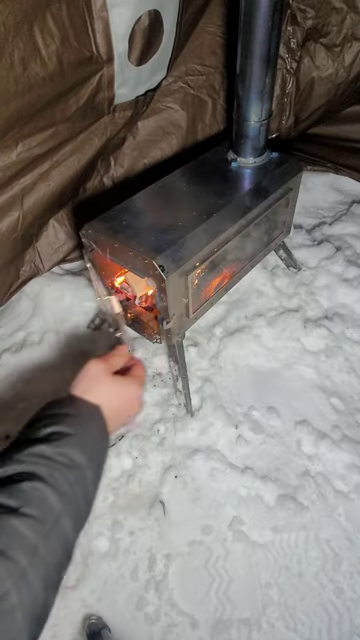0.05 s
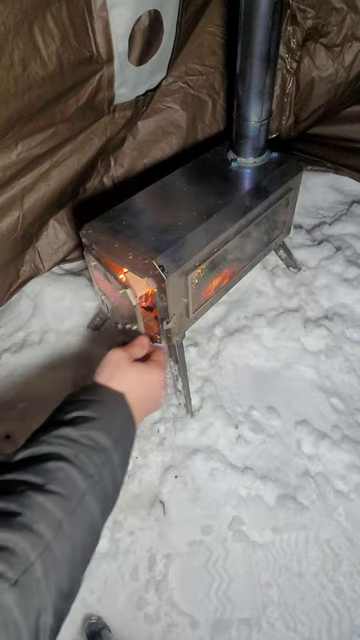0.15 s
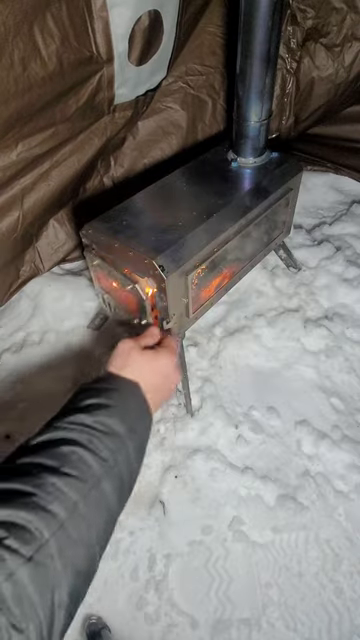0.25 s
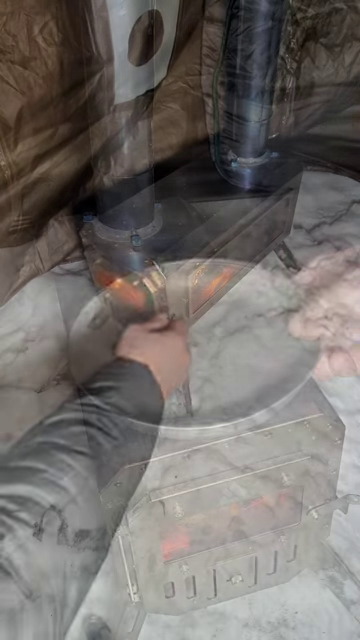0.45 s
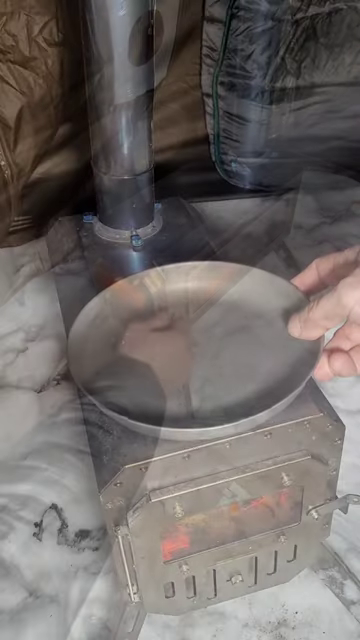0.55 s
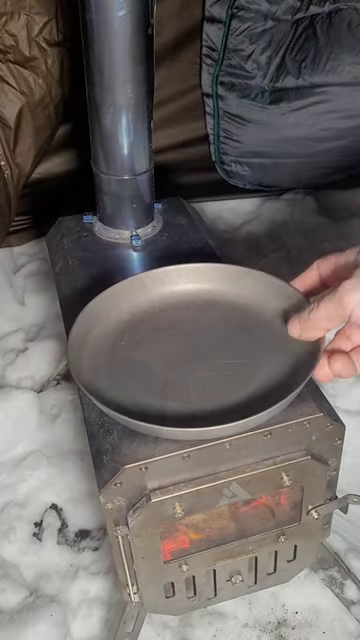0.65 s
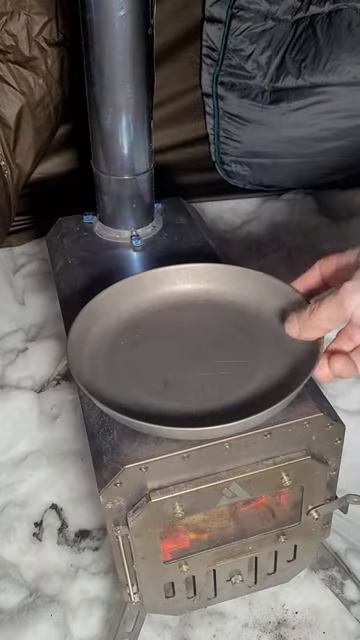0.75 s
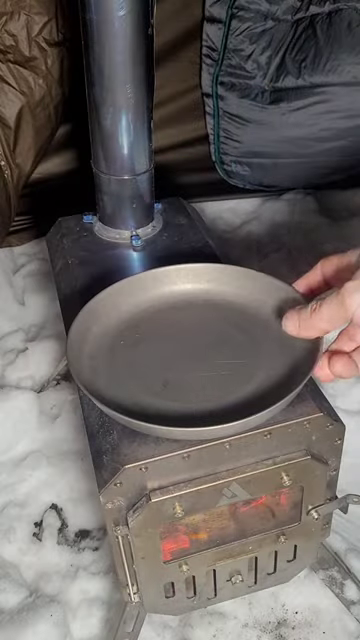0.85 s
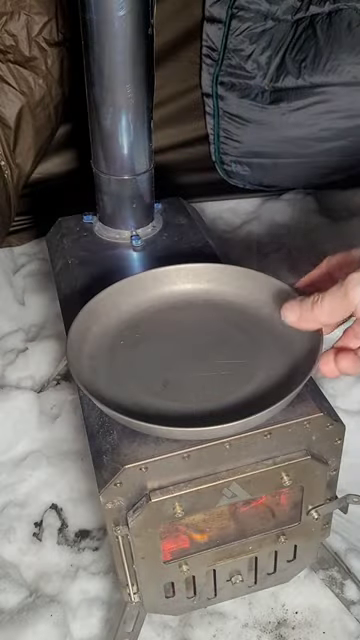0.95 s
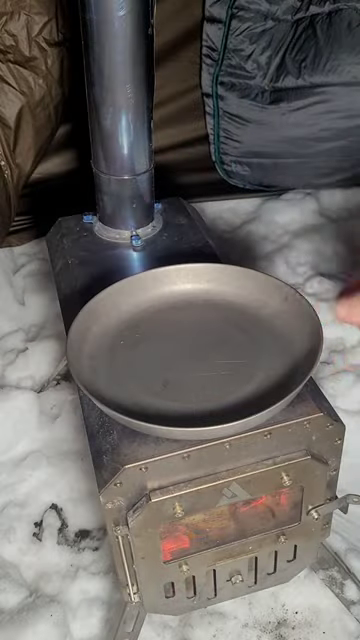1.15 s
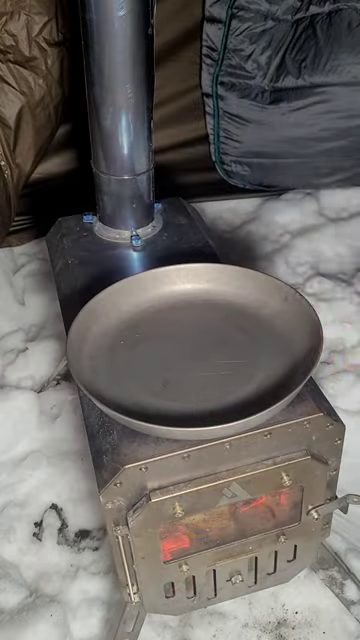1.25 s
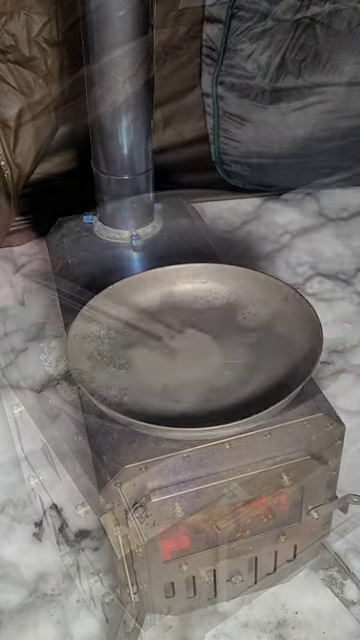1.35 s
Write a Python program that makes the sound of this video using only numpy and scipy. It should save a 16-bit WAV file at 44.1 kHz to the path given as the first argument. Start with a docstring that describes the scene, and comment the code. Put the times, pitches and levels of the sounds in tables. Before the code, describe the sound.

One sharp metal clack closes a stove door, followed by a light pan set down and pushed about in short, hissing scrapes. Two dull thuds come last, while the fire draws softly inside a tent with no echo.

```python
"""First comes the soft, low draught of a small sheet-steel wood stove, with a faint hiss and a sleeve's rustle.
The door shuts with one sharp clack, an impact that excites its modes, and the handle rubs home.
A light metal pan lands on the stove top and is pushed about in short scrapes: by stick-slip friction
the rim hisses, the base grinds and the top plate booms. Two dull thuds follow. The tent gives no echo."""
import sys
import numpy as np
from scipy import signal
from scipy.fft import rfft, irfft, next_fast_len
from scipy.io import wavfile
from scipy.ndimage import uniform_filter1d, map_coordinates

SR = 44100
rng = np.random.default_rng(int(sys.argv[2]) if len(sys.argv) > 2 else 0)


def pcm_store(signal):
    """Save signal as 16-bit PCM."""
    levels = np.round(np.clip(np.atleast_2d(signal), -1, 1) * 32767)
    wavfile.write(sys.argv[1], SR, levels.astype(np.int16).T)


N = 61739

# envelopes of the draught and the faint hiss (t/s, level/dB)
DRAUGHT_ENVELOPE = [(0, -59.5), (.11, -50), (.2, -54), (.3, -54.5), (.36, -58), (.45, -55.5), (.56, -53),
                    (.9, -59.5), (1.06, -58), (1.17, -58.5), (1.21, -52.5), (1.26, -56.5), (1.295, -50),
                    (1.35, -55.5), (1.4, -54.5)]
AIR_ENVELOPE = [(0, -57), (.18, -57), (.3, -59), (.39, -58), (.55, -55), (1.07, -65), (1.2, -62.5),
                (1.3, -60), (1.4, -58)]
# spectra of draught, faint hiss, sleeve and ticks (f/Hz, level/dB)
DRAUGHT_SPECTRUM = [(15, -43), (25, -17.5), (75, -10.5), (133, -4), (238, -1.5), (271, -3), (350, -17.5),
                    (429, -18), (554, -21), (800, -51.5), (1440, -65), (2000, -62), (2600, -65),
                    (4400, -120)]
AIR_SPECTRUM = [(350, -35), (600, -5), (833, -4), (905, -8.5), (1400, -19), (2230, -17), (4940, -12.5),
                (7240, -10.5), (9020, -17.5), (15800, -5.5)]
SLEEVE_SPECTRUM = [(250, -8), (500, 0), (820, 8), (1300, -6), (3000, -1.5), (8000, -20)]
TICK_SPECTRUM = [(1000, -33), (3500, -12), (7000, -1), (9000, -7), (13500, 10), (15700, 17), (16200, -17)]
# reach for the door (t/s, rise/s, length/s, sag/dB, level/dB)
SLEEVE_STROKES = [(0, 0.01, 0.326, 1, -66.5)]
# touches of handle and pan rim (t/s, level/dB)
TICK_TOUCHES = [(.047, -54), (.193, -44), (.601, -37), (.7505, -37), (.8335, -26), (.8975, -37),
                (1.231, -58)]

# spectra of the door's crack on each side and of its crowded high modes (f/Hz, level/dB)
CRACK_LEFT_SPECTRUM = [(150, -23.5), (550, -58), (1100, -3), (2600, -7.5), (4000, -13), (6000, -4),
                       (7400, 7), (8400, -7), (9700, 5.5), (12500, -12), (16000, -8)]
CRACK_RIGHT_SPECTRUM = [(150, -19), (550, -1.5), (1100, -16), (2600, -12.5), (4000, -22), (6000, -11),
                        (7400, -10.5), (9500, -11), (11000, -9), (13000, 12.5), (16000, -29)]
CLANG_SPECTRUM = [(500, -19.5), (1500, -6), (3000, -7.5), (5000, -4), (7300, -5), (8500, -1), (10500, -0.5),
                  (12500, 2.5), (15500, 4)]
# the latch rattling after the blow (t/s, level/dB re the crack)
LATCH_RATTLE = [(.2383, -23), (.2404, -22), (.2425, -21), (.2438, -21), (.2483, -25), (.2555, -30),
                (.2585, -31), (.2680, -36), (.2725, -37)]
# modes of door and frame (f/Hz, level/dB, T60/s)
DOOR_FRAME_MODES = [(166, -73, 0.32), (248, -26.5, 0.039), (276.4, -36.5, 0.076), (830, -25.5, 0.016),
                    (898, -33.5, 0.011), (1020, -47.5, 0.019), (1338, -24, 0.015), (2190, -27.5, 0.024),
                    (3560, -28, 0.017), (7420, -33, 0.054), (12400, -30, 0.082), (14800, -37, 0.066)]
# rubs of the handle in its catch (t/s, rise/s, length/s, sag/dB, rasp/dB, ring/dB)
HANDLE_RUBS = [(0.427, 0.0051, 0.052, -4, -51.5, -47), (0.465, 0.032, 0.018, -2, -52, -42.5),
               (0.492, 0.011, 0.031, -4, -54.5, -42)]

# pushes of the pan (t/s, rise/s, length/s, sag/dB, hiss/dB, grind/dB, boom/dB)
PAN_PUSHES = [(0.587, 0.022, 0.015, -3.5, -29.5, -51, -44.5), (0.616, 0.0056, 0.033, -2, -53.5, -54, -44.5),
              (0.648, 0.011, 0.032, 0, -70, -45.5, -39.5), (0.661, 0.013, 0.04, -9, -33.5, -36, -33),
              (0.693, 0.013, 0.023, -4, -43.5, -53, -40.5), (.748, .005, 0.011, -3, -60, -51, -40.5),
              (0.756, 0.011, 0.011, -0.5, -76, -69, -43), (0.787, 0.0088, 0.022, -7, -69, -67.5, -49),
              (0.797, 0.015, 0.044, -1.5, -45.5, -71, -72), (0.82, 0.0037, 0.023, 0.5, -33, -72, -52),
              (0.854, 0.0093, 0.042, -3.5, -39, -62, -43.5), (.900, 0.0067, 0.024, -10.5, -52, -72, -47),
              (0.923, 0.032, 0.06, -4, -47.5, -63.5, -70), (.966, 0.005, 0.043, -5, -49.5, -59.5, -55.5)]
# spectra of handle rasp, rim hiss, its bite on landing, pan base and shaking legs (f/Hz, level/dB)
RASP_SPECTRUM = [(300, 7), (900, -17), (1400, -1.5), (2500, -2.5), (5000, -5.5), (9000, -12), (15000, -13)]
RIM_SPECTRUM = [(1500, -36), (2600, -17), (3600, -15), (4700, -3.5), (7000, 0.5), (9000, -2), (11500, 0),
                (14000, 2.5), (15600, 6.5), (16200, -32.5)]
BITE_SPECTRUM = [(2000, -18.5), (3400, 2), (4300, 1.5), (6000, -7), (7500, 5), (9500, -19)]
GRIND_SPECTRUM = [(300, -11), (600, -2.5), (850, 5), (1200, -3), (1900, 4), (2400, 1.5), (3200, 1.5),
                  (4800, 0.5), (7000, -11), (10000, -15)]
LEG_SPECTRUM = [(20, -12), (60, 6), (110, 6.5), (180, -9), (400, -35)]
# resonances of stove front, pan and top plate (f/Hz, bandwidth/Hz, level/dB)
STOVE_FRONT_MODES = [(136, 28, 2), (188, 54, 1), (256, 56, 2), (440, 170, -12), (875.4, 13.4, 1)]
PAN_BODY_MODES = [(900, 75, 4.5), (1224, 39, 7.5), (2260, 68, 5), (2470, 43, 10.5), (3695, 15, 12),
                  (4654, 22, 7)]
TOP_PLATE_MODES = [(99, 8.3, -28), (170.2, 33.3, -2.5), (222.6, 32.2, 0.5), (264.2, 24.8, -1.5),
                   (299, 40, -5), (404.5, 23, -9.5), (458.8, 18.4, -7.5), (540, 18, -12.5),
                   (582, 105, -17.5), (690.3, 7.3, -15), (804, 15, -17.5), (912, 15, -21)]
# the pan touching down (t/s, plate f/Hz, plate/dB, clank/dB)
PAN_LANDINGS = [(0.599, 279.5, -28.5, -62), (.655, 193, -28.5, -30), (.672, 224.4, -32.5, -46),
                (.767, 238, -27, -50.5), (.826, 240, -37, -71)]
# thuds once the pan is still (t/s, f/Hz, level/dB)
LOW_THUDS = [(1.288, 119, -39), (1.329, 138, -36)]

# likeness of the two channels (f/Hz, correlation)
COHERENCE = [(200, 0.98), (700, 0.7), (1500, 0.35), (4000, 0.024), (15000, 0)]
# stereo balances (f/Hz, left minus right/dB)
CLANG_BALANCE = [(1000, 6), (5000, 1), (9000, 9.5), (11000, -11), (13000, -11), (16000, 12.5)]
SCRAPE_BALANCE = [(300, 0), (1500, 4), (4000, 3.5), (7500, 4), (10500, 2), (15000, -2.5)]
FRONT_BALANCE, AIR_BALANCE = [(200, -2.5)], [(2000, 1), (12000, -0.92)]
SLEEVE_BALANCE, TICK_BALANCE = [(1000, 0.004)], [(4000, 2.4), (13000, -1)]

TIME = np.arange(N) / SR
DOOR_S = 0.2367


def amp(db):
    """Amplitude ratio of a level in decibels."""
    return 10 ** (np.asarray(db) / 20)


def unit(x):
    """Normalisation to rms 1."""
    return x / np.sqrt(np.mean(x ** 2) + 1e-20)


def along(points, hz):
    """Interpolation on a logarithmic frequency axis."""
    f, v = np.transpose(points)
    return np.interp(np.log(hz + 1), np.log(f + 1), v)


def envelope(points):
    """Gain per sample, interpolated in decibels."""
    return amp(np.interp(TIME, *np.transpose(points)))


def noise():
    """Two independent channels of white noise."""
    return rng.standard_normal((2, N))


def filtered(x, response):
    """Linear filtering: the spectrum is multiplied by a frequency response."""
    m = next_fast_len(N + SR // 2)
    return irfft(rfft(x, m) * response(np.fft.rfftfreq(m, 1 / SR)), m)[..., :N]


def colour(points):
    """Magnitude response through the points of a spectrum."""
    return lambda hz: amp(along(points, hz))


def resonances(modes):
    """Modal superposition: damped resonators add with alternating sign."""
    return lambda f: sum((-1) ** k * amp(db) * 1j * f * width / (f0 * f0 - f * f + 1j * f * width)
                         for k, (f0, width, db) in enumerate(modes))


def decay(start, t60):
    """Exponential damping from start, by 60 dB in t60 seconds."""
    t = TIME - start
    return (t >= 0) * np.exp(-np.log(1000) * np.maximum(t, 0) / t60)


def stroke(start, rise, length, sag_db, t60=0.14):
    """Driven vibration swells and sags during a rub, then decays freely."""
    t = TIME - start
    swell = np.clip(t / rise, 0, 1) ** 2
    sag = amp(sag_db * np.clip(t / length, 0, 1))
    return swell * sag * np.exp(-np.log(1000) * np.maximum(t - length, 0) / t60)


def stereo(pair, response, balance):
    """Partial coherence: two signals mix to stereo of rms 1, alike in the bass, apart in the treble."""
    angle = lambda hz: np.arccos(np.clip(along(COHERENCE, hz), -1, 1)) / 2
    mid, side = filtered(pair, lambda hz: response(hz) * np.array([np.cos(angle(hz)), np.sin(angle(hz))]))
    gains = lambda hz: amp(along(balance, hz) * np.array([[.5], [-.5]]))
    return unit(filtered(np.array([mid + side, mid - side]), gains))


def steadied(x, samples=900):
    """Division by the running rms evens out the chance swells of narrow-band noise."""
    return x / np.sqrt(np.abs(uniform_filter1d(np.mean(x ** 2, axis=0), samples)) + 1e-3)


def draught():
    """Flow noise: the air drawn by the fire flutters at low frequencies."""
    flow = stereo(noise(), colour(DRAUGHT_SPECTRUM), FRONT_BALANCE)
    return envelope(DRAUGHT_ENVELOPE) * steadied(flow, samples=1200)


def fire_hiss(pops_per_s=25, pop_db=20.5, spread_db=0.5):
    """Shot noise: the fire's sparse random impulses crackle in a faint hiss."""
    pops = (rng.random(N) < pops_per_s / SR) * amp(pop_db + spread_db * noise())
    return envelope(AIR_ENVELOPE) * stereo(noise() + pops, colour(AIR_SPECTRUM), AIR_BALANCE)


def sleeve():
    """Friction noise of cloth: a sleeve rustles as it reaches for the door."""
    reach = sum(amp(db) * stroke(*shape) for *shape, db in SLEEVE_STROKES)
    return reach * stereo(noise(), colour(SLEEVE_SPECTRUM), SLEEVE_BALANCE)


def ticks():
    """Brief contacts of metal excite mainly high frequencies, which damp quickly."""
    touches = sum(amp(db) * decay(s, t60=.04) for s, db in TICK_TOUCHES)
    return touches * stereo(noise(), colour(TICK_SPECTRUM), TICK_BALANCE)


def crack(spectrum, size=2048):
    """A minimum-phase pulse: the energy of an impact comes as early as its spectrum allows."""
    cepstrum = irfft(np.log(amp(along(spectrum, np.fft.rfftfreq(size, 1 / SR)))))
    cepstrum[1:size // 2] *= 2
    cepstrum[size // 2 + 1:] = 0
    return irfft(np.exp(rfft(cepstrum)))


def wandering_mode(hz, t, depth=.011, changes_per_s=350):
    """Random frequency modulation: a mode's pitch wanders as loose parts touch."""
    drift = depth * map_coordinates(rng.standard_normal(N), [t * changes_per_s])
    return np.cos(2 * np.pi * hz * (t + np.cumsum(drift * (t > 0)) / SR))


def door(crack_db=5.5, scatter_s=.0002, attack_s=0.00013):
    """Impact excitation: the door cracks on its frame, the latch rattles and the modes ring freely."""
    t = np.maximum(TIME - DOOR_S, 0)
    impulses = np.zeros((2, N))
    impulses[:, round(DOOR_S * SR)] = amp(crack_db)
    for s, db in LATCH_RATTLE:
        arrivals = np.round((s + scatter_s * rng.standard_normal(2)) * SR).astype(int)
        impulses[[0, 1], arrivals] += amp(crack_db + db)
    snap = np.array([signal.fftconvolve(side, crack(spectrum))[:N]
                     for side, spectrum in zip(impulses, (CRACK_LEFT_SPECTRUM, CRACK_RIGHT_SPECTRUM))])
    ring = sum(amp(db + rng.normal(0, 1)) * decay(DOOR_S, t60) * wandering_mode(hz, t)
               for hz, db, t60 in DOOR_FRAME_MODES)
    two_stage_decay = amp(-14) * decay(DOOR_S, t60=0.024) + amp(-29) * decay(DOOR_S, t60=0.12)
    clang = two_stage_decay * stereo(noise(), colour(CLANG_SPECTRUM), CLANG_BALANCE)
    return snap + (ring + clang) * (1 - np.exp(-t / attack_s))


def friction(spectrum, slips_per_s=5000, spread_db=-0.5, grit_db=2.2, grit_per_s=450,
             ripple_db=3.1, mode_spacing_hz=70):
    """Stick-slip friction: a dense, uneven train of tiny slips drives the metal's crowded resonances."""
    grit = amp(grit_db * map_coordinates(rng.standard_normal(N), [TIME * grit_per_s]))
    slips = (rng.random((2, N)) < slips_per_s / SR) * noise() * amp(spread_db * noise())
    mode_strengths = rng.standard_normal(N)
    ripple = lambda hz: amp(ripple_db * map_coordinates(mode_strengths, [hz / mode_spacing_hz]))
    return unit(grit * stereo(slips, lambda hz: colour(spectrum)(hz) * ripple(hz), SCRAPE_BALANCE))


def handle():
    """Forced vibration: the handle rasps in its catch and makes the stove front ring."""
    rasp = friction(RASP_SPECTRUM)
    ring = steadied(stereo(noise(), resonances(STOVE_FRONT_MODES), FRONT_BALANCE))
    return sum(stroke(*shape) * (amp(rasp_db) * rasp + amp(ring_db) * ring)
               for *shape, rasp_db, ring_db in HANDLE_RUBS)


def pan_scrapes(bite_db=-3, bite_fade_db_per_s=51, ring_db=-9, legs_db=-16.5):
    """Sliding friction: the rim hisses, the base grinds and rings, the plate booms as a sounding board."""
    since_first_push = np.maximum(TIME - PAN_PUSHES[0][0], 0)
    bite = amp(bite_db - bite_fade_db_per_s * since_first_push) * friction(BITE_SPECTRUM)
    rim_spots = [friction(RIM_SPECTRUM) + bite for _ in range(3)]
    grind = friction(GRIND_SPECTRUM)
    grind += amp(ring_db) * stereo(noise(), resonances(PAN_BODY_MODES), SCRAPE_BALANCE)
    plate = stereo(noise(), resonances(TOP_PLATE_MODES), SCRAPE_BALANCE)
    legs = amp(legs_db) * stereo(noise(), colour(LEG_SPECTRUM), SCRAPE_BALANCE)
    boom = steadied(plate + legs, samples=500)
    return sum(stroke(*shape) * (amp(hiss_db) * rim_spots[k % 3] + amp(grind_db) * grind
                                 + amp(boom_db) * boom)
               for k, (*shape, hiss_db, grind_db, boom_db) in enumerate(PAN_PUSHES))


def struck_mode(start, hz, db, t60, rise_s=0.0045):
    """A softly struck resonance vibrates as a damped sinusoid."""
    t = np.maximum(TIME - start, 0)
    return amp(db) * (1 - np.exp(-t / rise_s)) * decay(start, t60) * np.sin(2 * np.pi * hz * t)


def pan_knocks(clank_hz=893):
    """The point of impact selects the plate's mode, while the pan clanks at its own natural frequency."""
    return sum(struck_mode(s, hz, plate_db, t60=0.072) + struck_mode(s, clank_hz, clank_db, t60=0.074)
               for s, hz, plate_db, clank_db in PAN_LANDINGS)


def thuds():
    """Heavily damped low resonances are heard as dull thuds."""
    return sum(struck_mode(s, hz, db, t60=0.087) for s, hz, db in LOW_THUDS)


def scene(left_lead_s=.00013):
    """The sources superpose; an interaural time difference puts the stove a little to the left."""
    stove = (door() + handle() + pan_scrapes() + pan_knocks() + thuds() + ticks()
             + draught() + fire_hiss() + sleeve())
    return filtered(stove, lambda hz: np.exp(1j * np.pi * hz * left_lead_s * np.array([[1], [-1]])))


def record(dry):
    """Band limiting by an ideal low-pass filter."""
    return filtered(dry, lambda hz: hz < 15950)


dry = scene()
out = record(dry)
pcm_store(out)
```